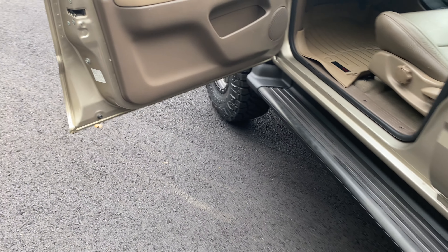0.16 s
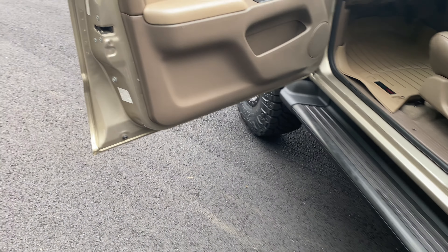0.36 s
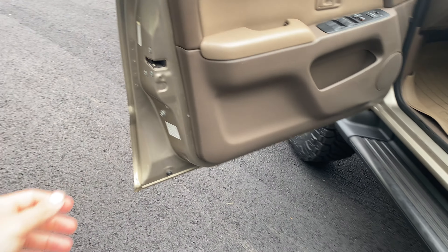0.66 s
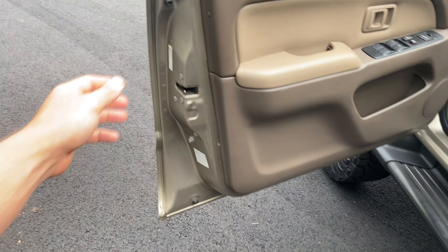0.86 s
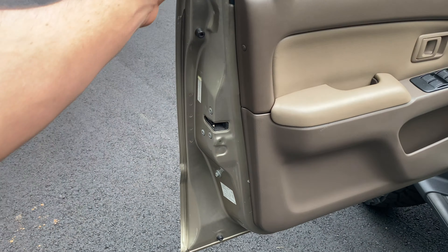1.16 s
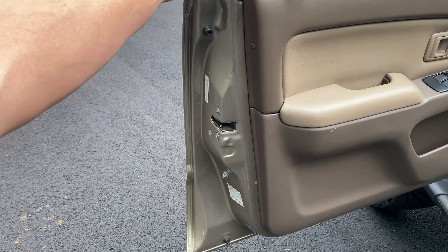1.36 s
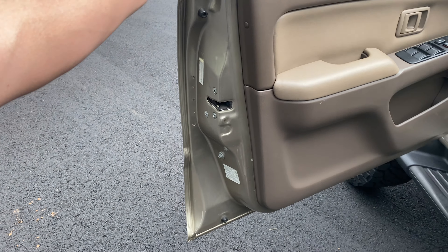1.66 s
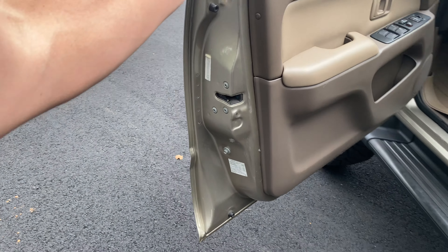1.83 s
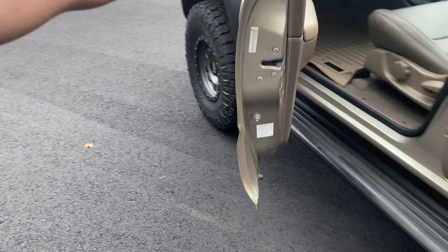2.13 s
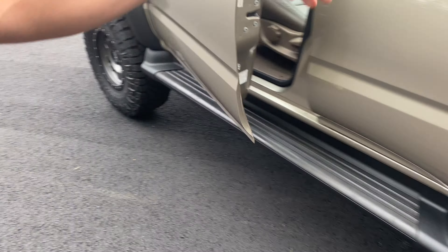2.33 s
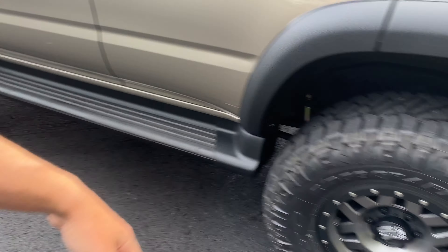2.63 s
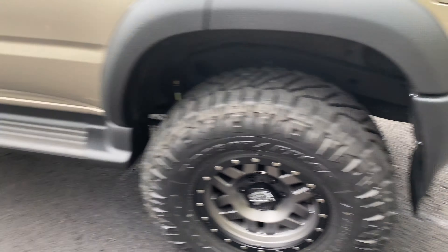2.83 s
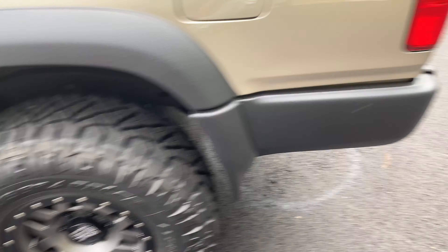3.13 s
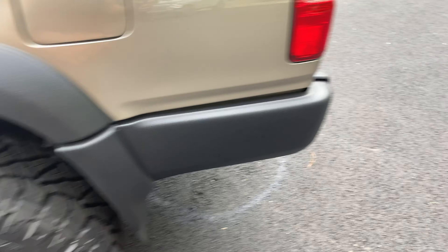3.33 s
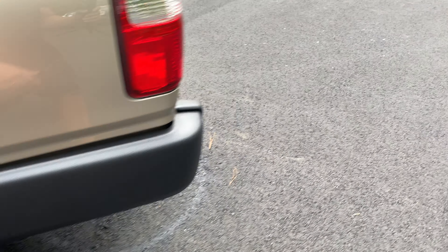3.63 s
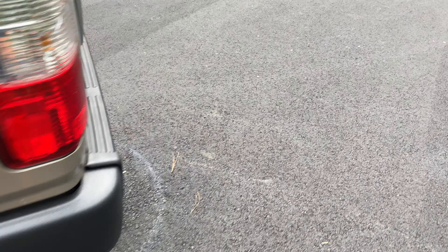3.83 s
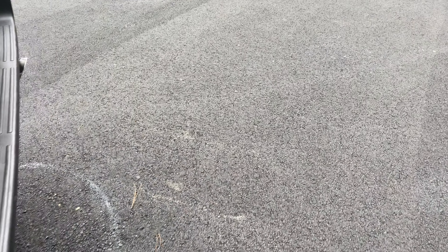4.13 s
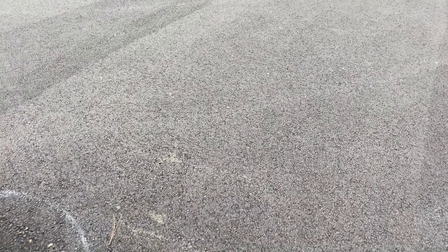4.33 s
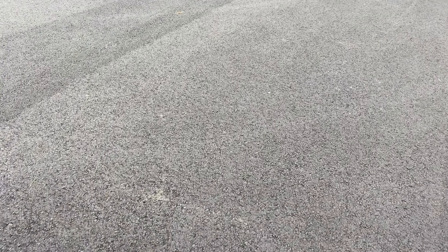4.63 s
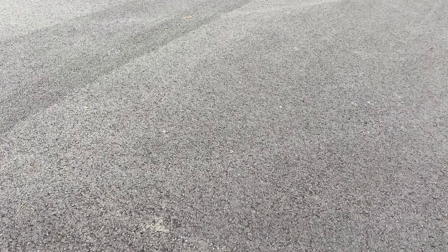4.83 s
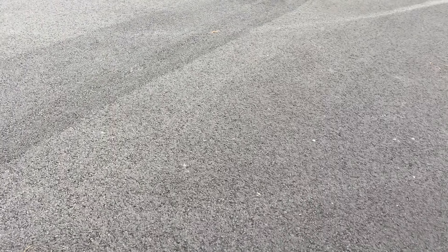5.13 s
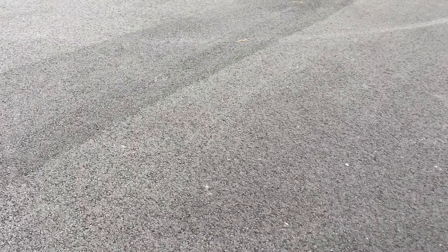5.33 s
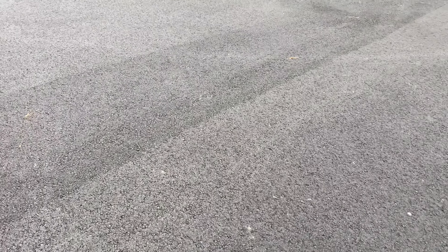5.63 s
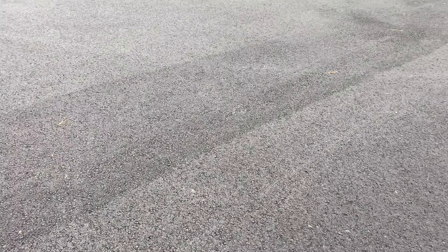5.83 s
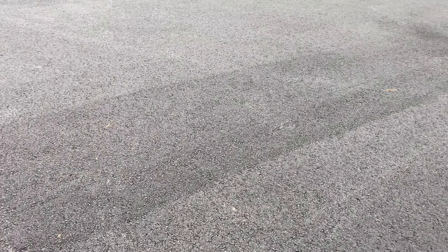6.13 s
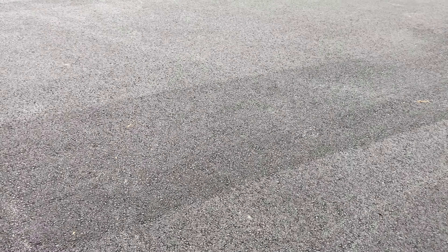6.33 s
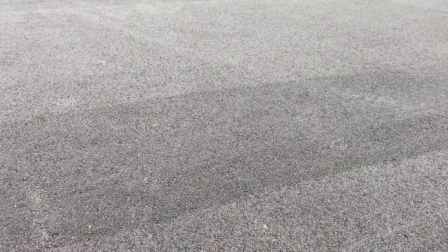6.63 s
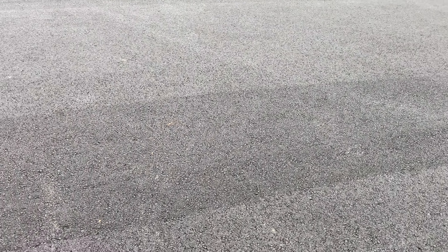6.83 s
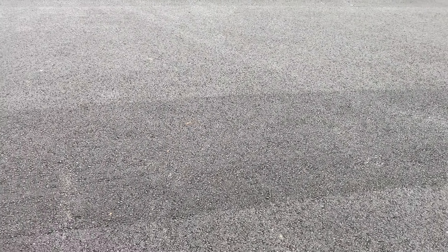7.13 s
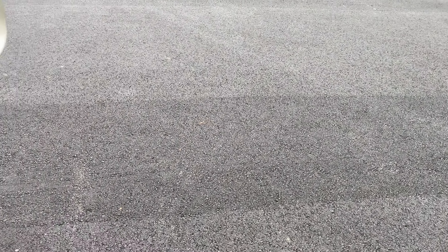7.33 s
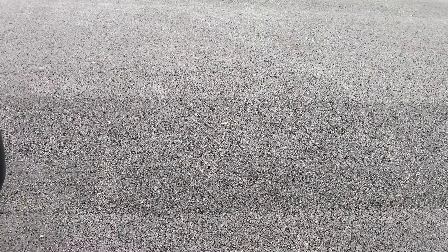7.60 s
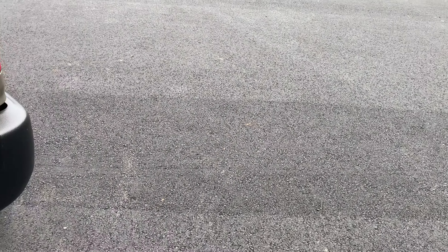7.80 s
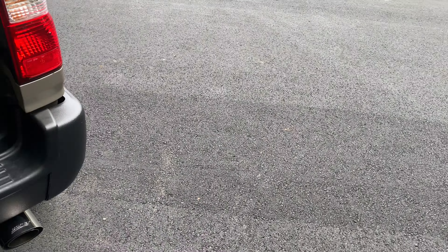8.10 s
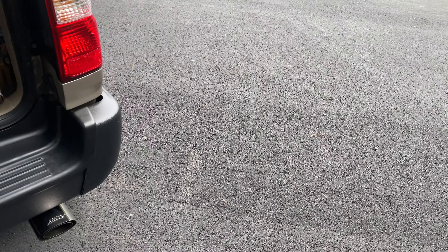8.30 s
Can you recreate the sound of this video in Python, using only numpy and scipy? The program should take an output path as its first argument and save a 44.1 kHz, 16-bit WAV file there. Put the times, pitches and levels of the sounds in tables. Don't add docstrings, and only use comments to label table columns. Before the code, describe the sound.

Close handheld stereo pickup in an open asphalt lot. A car door slams at once, with metallic rattle and a deep cabin thump. Soft steps and tiny clicks follow, then a second door shuts more quietly. Wind buffets over distant traffic and a faint hum. Later a tailgate latch cracks sharply, and light clicks and knocks end it.

```python
import sys
import numpy as np
from scipy import signal
from scipy.fft import rfft, irfft, next_fast_len
from scipy.io import wavfile
from scipy.ndimage import uniform_filter1d, map_coordinates

SR = 44100
rng = np.random.default_rng(int(sys.argv[2]) if len(sys.argv) > 2 else 0)


def digitize_waveform(pressure):
    field = np.atleast_2d(pressure).T
    bounded = np.clip(field, -1, 1)
    quanta = np.round(bounded * 32767).astype(np.int16)
    wavfile.write(sys.argv[1], SR, quanta)


def makeup_ratio(level_db):
    decades = np.asarray(level_db, float) / 20
    return 10 ** decades


N = 373086
PORTS = np.array([[0.5], [-0.5]])


def unit(x):
    return x / np.sqrt(np.mean(x ** 2) + 1e-20)


def along(points, hz):
    f, v = np.transpose(points)
    return np.interp(np.log(hz + 1), np.log(f + 1), v)


def curves(rows):
    s, *cols = np.transpose(rows)
    return [np.interp(np.arange(N) / SR, s, c) for c in cols]


def wobble(rate):
    t = np.linspace(0, N / SR, num=N // 20)
    knots = rng.standard_normal(int(N * rate / SR) + 4)
    return np.interp(np.arange(N) / SR, t, map_coordinates(knots, [t * rate]))


def bells(s, span, size):
    t = np.linspace(0, N / SR, num=2000)
    rows = np.exp(-0.5 * ((t[:, None] - s) / span) ** 2) * size
    return np.interp(np.arange(N) / SR, t, rows.sum(axis=1))


def filtered(x, response):
    m = next_fast_len(x.shape[-1] + 8192)
    spectrum = rfft(x, m) * response(np.fft.rfftfreq(m, 1 / SR))
    return irfft(spectrum, m)[..., :x.shape[-1]]


def resonances(peaks):
    return lambda f: sum((-1) ** k * makeup_ratio(db) * 1j * f * w / (c * c - f * f + 1j * f * w)
                         for k, (c, w, db) in enumerate(peaks))


def panned(db):
    return makeup_ratio(np.outer([0.5, -0.5], db))


def aside(x, pan_db):
    # hz, share
    shadow = [(130, 0.17), (300, 0.34), (700, 0.55), (7000, 0.99), (14000, 0.12)]
    shaded = filtered(x, lambda hz: np.clip(along(shadow, hz), 0, 1))
    return x + (panned(pan_db) - 1) * shaded


def widened(x):
    # hz, side_db
    side_colour = [(4000, 1), (6500, 1), (8500, 6), (11000, 2), (13000, -7)]
    mid = (x[0] + x[1]) / 2
    side = filtered((x[0] - x[1]) / 2, lambda hz: makeup_ratio(along(side_colour, hz)))
    return np.array([mid + side, mid - side])


def add(track, s, sound):
    part = track[:, round(s * SR):round(s * SR) + sound.shape[1]]
    part += sound[:, :part.shape[1]]


def rush(spectrum, alike):
    turn = lambda hz: np.arccos(np.clip(along(alike, hz), -1, 1)) / 2
    mid, side = filtered(rng.standard_normal((2, N)),
                         lambda hz: makeup_ratio(along(spectrum, hz)) * [np.cos(turn(hz)), np.sin(turn(hz))])
    return unit(np.array([mid + side, mid - side]))


def steady(x, span):
    return x / np.sqrt(np.abs(uniform_filter1d(np.mean(x ** 2, 0), size=int(span * SR))) + 1e-9)


def burst(t60, spread, rise_s=0.0019):
    t = np.arange(SR // 4) / SR
    shared, own = rng.standard_normal((2, len(t)))
    noise = np.array([shared + spread * own, shared - spread * own])
    return noise * makeup_ratio(-60 * t / t60) * (1 - np.exp(-t / rise_s))


def impact(contacts, body, rattle, body_db, linger, apart=0.84, body_apart=0.21):
    out = np.zeros((2, N))
    for s, db, rel_db, t60, pan_db in contacts:
        bright = filtered(burst(t60, apart), lambda hz: makeup_ratio(along(rattle, hz)))
        panel = filtered(burst(linger * t60, body_apart), resonances(body))
        sound = bright / np.abs(bright).max() + makeup_ratio(rel_db + body_db) * panel / np.abs(panel).max()
        add(out, s, makeup_ratio(db) * aside(sound, [pan_db]))
    return out


def booms(modes, pan_db, inward=False, turn=0.0):
    out, t = np.zeros((2, N)), np.arange(SR // 2) / SR
    for s, hz, db, t60 in modes:
        swell = 1 - np.exp(-t * hz * 6)
        wave = np.sin(2 * np.pi * hz * t + turn * PORTS) / np.cos(turn / 2)
        add(out, s, panned([pan_db]) * makeup_ratio(db - 60 * t / t60) * swell * wave)
    return -out if inward else out


def ticks(rows, width, spread):
    out = np.zeros((2, N))
    for s, db, hz, t60, pan_db in rows:
        band = resonances([(hz, width * hz, 0)])
        tick = filtered(burst(t60, spread, rise_s=0.0003), lambda f: band(f) ** 2)
        add(out, s, makeup_ratio(db) * panned([pan_db]) * tick / np.abs(tick).max())
    return out


def wind():
    # peak_s, buffet_db, half_length_s, flutter_over_buffet_db
    gusts = [(0.267, -39.5, 0.056, 0), (0.552, -48.5, 0.43, -24), (0.837, -44.5, 0.07, -16),
             (1.113, -43, 0.087, -27), (1.62, -40, 0.11, -35), (1.946, -36, 0.067, -34),
             (2.165, -36, 0.052, -26), (2.29, -43.5, 0.034, -20), (2.456, -38, 0.055, -30),
             (2.67, -46.5, 0.079, -5), (3.208, -47, 0.067, -11), (3.47, -45, 0.073, -14),
             (3.65, -68, 0.056, 2), (3.898, -46, 0.087, -13), (4.313, -43.5, 0.21, -17.5),
             (4.815, -32, 0.063, -23.5), (5.11, -46.5, 0.25, -11.5), (5.334, -32.5, 0.058, -27),
             (5.483, -34, 0.085, -8), (5.735, -35, 0.15, -9.5), (5.893, -30.5, 0.073, -12),
             (6.134, -37.5, 0.077, -10.5), (6.606, -48.5, 0.32, -8), (6.956, -41.5, 0.092, -13.5),
             (7.263, -43.5, 0.092, -4.5), (7.5, -41, 0.52, -16), (7.953, -36, 0.089, -15.5),
             (8.28, -44.5, 0.26, -12.5)]
    # hz, db_per_hz
    buffet_colour = [(2, -30), (5, 15), (16, 8.5), (25, 2), (40, -17), (80, -83)]
    # hz, db_per_hz
    flutter_colour = [(12, -67), (25, -7.5), (50, -6), (100, -16), (200, -36.5), (500, -80)]
    # hz, db_per_hz
    whip_colour = [(70, -26), (130, 6.5), (220, -7), (350, -11), (600, -58)]
    calm_buffet_db, calm_flutter_db = -55, -64.5
    s, db, half_s, rel_db = np.transpose(gusts)
    slow = np.sqrt(makeup_ratio(2 * calm_buffet_db) + bells(s, half_s / np.sqrt(2), makeup_ratio(2 * db)))
    quick = np.sqrt(makeup_ratio(2 * calm_flutter_db) + bells(s, half_s / np.sqrt(2), makeup_ratio(2 * (db + rel_db))))
    lumps = makeup_ratio(2.6 * wobble(20))
    flutter = steady(lumps * rush(flutter_colour, [(30, 0.7), (200, 0.37)]), span=0.17)
    whip_level = np.minimum(quick / makeup_ratio(-44.5), 1) ** 1.32 * makeup_ratio(-63.5 + 7.2 * wobble(17))
    whip = whip_level * rush(whip_colour, [(150, 0.26)])
    return slow * steady(rush(buffet_colour, [(10, 0.92)]), span=0.33) + quick * flutter + whip


def town():
    # time_s, left_right_db, tyre_roar_db
    walk = [(0, 2.5, -91), (2.5, 3.5, -74), (2.85, 5.5, -67), (5.2, 3, -69), (6.5, 4, -67.5),
            (8.46, 2, -63.5)]
    # hz, db_per_hz
    air_colour = [(30, -39), (60, -6), (110, -7), (146, -12.5), (190, -13.5), (234, -11), (330, -16),
                  (400, -17.5), (520, -20), (1150, -21), (1340, -24), (5000, -29), (10500, -35),
                  (12500, -38), (14500, -43), (16000, -45)]
    # hz, db_per_hz
    roar_colour = [(300, -21), (700, -3), (1200, -2.5), (2000, -7), (3500, -50)]
    # hz, correlation
    agreement = [(60, .85), (130, .6), (290, .5), (640, .62), (3100, .55), (6800, .12), (10500, .38),
                 (13000, .66), (15000, .8)]
    pan_db, roar_db = curves(walk)
    air = makeup_ratio(-63.5) * rush(air_colour, agreement)
    roar = makeup_ratio(roar_db - 5.5) * rush(roar_colour, agreement)
    return aside(air + roar, pan_db)


def machine():
    # pitch_hz, unsteadiness_hz, level_db, passed_at_s, audible_for_s
    hum_lines = [(69.7, 3.13, -66, 3.2, 2.9), (90, 1.83, -61.5, 3.55, 0.51), (293, 4.46, -77, 2.96, 1.36),
                 (240, 2.36, -73, 0.84, 0.23), (240, 3.5, -72, 1.97, 0.32), (1160, 6.2, -79.5, 3.84, 0.66)]
    # pitch_hz, level_db, passed_at_s, audible_for_s
    shaft_lines = [(111.1, -63.5, 2.5, 1.86), (224.4, -73.5, 3.3, 1.5), (241, -73.5, 1, 1.67)]
    hum_turn = 0.95
    out = np.zeros((2, N))
    for hz, drift, db, s, span in hum_lines:
        swing = makeup_ratio(2.2 * wobble(5.0))
        phase = 2 * np.pi * np.cumsum(hz + drift * wobble(8)) / SR
        tone = swing * np.sin(phase + hum_turn * PORTS) / np.cos(hum_turn / 2)
        out += bells(s, span, makeup_ratio(db)) * tone
    for hz, db, s, span in shaft_lines:
        phase = 2 * np.pi * hz * np.arange(N) / SR
        out += bells(s, span, makeup_ratio(db)) * np.sin(phase + 0.71 * hum_turn * PORTS)
    return out


def seals():
    # start_s, peak_db, pitch_hz, t60_s, left_right_db
    rubber = [(.1715, -40, 840, .027, 4), (.775, -63, 2000, .16, 21), (1.6845, -49, 10500, 0.003, 1),
              (2.634, -53, 1610, .05, -2), (4.355, -60, 3500, .02, 2), (5.675, -55, 420, 0.078, 8),
              (6.425, -43, 2400, 0.089, 12), (6.50, -54, 590, 0.46, 5), (.225, -52, 4900, 0.11, 2),
              (8, -68, 2200, 0.28, 1), (6.55, -59.5, 4300, .05, 5), (0.21, -42, 1530, .13, 5),
              (0.18, -45, 5500, .14, 1), (.2, -44.5, 3100, 0.19, 4), (6.435, -48, 760, .14, 8)]
    return ticks(rubber, width=0.49, spread=0.34)


def slam():
    # start_s, rattle_peak_db, body_over_rattle_db, t60_s, left_right_db
    contacts = [
        (0.1725, -39.5, 2.5, 0.079, 9),
        (0.1858, -23, -5.5, 0.057, 8),
        (0.1954, -37, 0, 0.12, 4),
        (0.2134, -37.5, 5, 0.029, 18),
        (0.2204, -44.5, 5, 0.12, 8),
        (0.2314, -43, 2, 0.094, 10),
        (0.2494, -41.5, -5, 0.046, 3),
        (0.2644, -54, 4, 0.067, 12),
    ]
    # pitch_hz, width_hz, level_db
    body = [(142, 37, 4.5), (214, 26, 3.5), (266, 28, 0), (312, 82, 1.5), (443, 95, -3), (560, 220, -10.5),
            (803, 62, -7.5), (950, 150, -11.5), (1100, 77, -10.5), (1450, 99, -19)]
    # hz, db
    rattle = [(710, -10), (1200, -3), (1560, -3), (1870, -15), (2510, -7), (3180, -18), (3830, -14.5),
              (5780, -19.5), (6300, -20), (13200, -24.5), (16000, -40)]
    # start_s, pitch_hz, peak_db, t60_s
    pings = [(.1855, 6400, -46, .012), (.187, 1106, -33.5, 0.044), (.187, 2420, -36, 0.04),
             (.190, 420, -28.5, 0.046), (.1862, 4840, -34, .01), (.196, 3800, -38, .012),
             (.2495, 3660, -47, .015), (.1718, 300, -40, .04), (.1718, 1000, -43, .03),
             (.189, 1730, -41, .03), (.247, 1004, -48, .05), (.256, 700, -51, .05),
             (.211, 1100, -38, 0.035), (.2125, 3600, -43, .02), (.214, 1790, -41.5, .04),
             (.224, 995, -40, 0.057), (.232, 1400, -43, .04), (.262, 2050, -56, 0.035),
             (.264, 3650, -58, .015), (.283, 1016, -57, 0.051)]
    return impact(contacts, body, rattle, body_db=6.0, linger=1.48) + booms(pings, pan_db=3.5, turn=1.5)


def slam_ring():
    # start_s, pitch_hz, peak_db, t60_s
    thump = [
        (.189, 27.5, -21.5, .34),
        (.224, 41, -28, .13),
        (.195, 60, -28, .16),
    ]
    # start_s, pitch_hz, peak_db, t60_s
    skin = [(.1985, 139, -30, 0.12), (.2125, 125, -28.5, 0.17), (0.173, 155, -37, 0.23),
            (0.262, 250, -40, 0.18), (.2, 105, -34, .14), (.204, 560, -41, 0.086), (.19, 595, -40, 0.042),
            (.188, 1415, -29.5, 0.045), (.188, 1534, -36, 0.056)]
    return booms(thump, pan_db=2.0) + booms(skin, pan_db=4.0, turn=0.3)


def lot(x):
    # hz, t60_s
    decay = [(100, 0.44), (700, 0.28), (3000, 0.11), (10000, 0.019)]
    # hz, db
    echo_colour = [(500, -1), (2500, 1.5), (5000, -1), (12000, -24)]
    hz, t, z = signal.stft(rng.standard_normal((2, SR // 2)), SR, nperseg=256)
    tail = signal.istft(z * makeup_ratio(-60 * t / along(decay, hz)[:, None]), SR, nperseg=256)[1]
    delayed = np.pad(x, ((0, 0), (600, 0)))
    echo = signal.fftconvolve(delayed, tail / np.linalg.norm(tail[0]), axes=1)[:, :N]
    return filtered(echo, lambda f: makeup_ratio(along(echo_colour, f) - 20.0))


def pins():
    # start_s, peak_db, pitch_hz, t60_s, left_right_db
    clicks = [(.22, -47, 9300, .02, 2), (2.199, -59, 14500, .02, -1), (2.201, -43, 11000, .05, -4),
              (2.204, -51, 12500, .04, -2), (2.328, -63, 12000, .01, 0), (2.70, -57, 8500, .015, -1),
              (6.19, -67, 10500, .05, -10), (6.272, -68, 5000, .04, 6), (6.3985, -36, 4470, 0.012, 0),
              (6.396, -32, 6200, .01, 9)]
    return ticks(clicks, width=0.072, spread=0.38)


def footsteps():
    # start_s, peak_db, pitch_hz, left_right_db
    treads = [(.785, -49.5, 800, 0), (1.58, -64, 450, -12), (2.33, -53, 600, 3), (2.38, -58, 900, 0),
              (2.96, -59, 500, -10), (3.62, -56, 500, 9), (3.70, -57, 450, 10), (4.25, -70, 600, 0),
              (4.875, -55, 600, 6), (4.92, -59, 600, 4), (4.97, -66, 600, 5), (6.0, -53, 1500, 7)]
    t60_s = 0.12
    return ticks([(s, db, hz, t60_s, pan_db) for s, db, hz, pan_db in treads], width=1.8, spread=2.0)


def clips():
    # start_s, pitch_hz, peak_db, t60_s
    clip_pings = [
        (2.5, 2330, -58, .015),
        (2.173, 2150, -54, .025),
        (1.6845, 11800, -48, .003),
    ]
    return booms(clip_pings, pan_db=3.0)


def trim():
    # start_s, peak_db, pitch_hz, t60_s, left_right_db
    trim_knocks = [(2.038, -52, 1620, 0.012, -2), (2.159, -56, 1020, 0.014, 9), (2.16, -50, 2270, .012, 7),
                   (2.171, -51.5, 950, 0.027, 2), (2.172, -50, 2100, 0.04, 16),
                   (2.329, -57, 1400, 0.015, 6), (6.037, -56.5, 2500, 0.102, 14),
                   (6.043, -56, 800, 0.08, 15), (7.388, -50, 2400, 0.036, -2), (7.282, -51, 4600, .05, 3)]
    return ticks(trim_knocks, width=0.53, spread=0.9)


def hinge():
    # start_s, peak_db, pitch_hz, t60_s, left_right_db
    squeak = [
        (2.10, -70, 7650, 0.98, 7),
    ]
    return ticks(squeak, width=0.032, spread=0.57)


def shut():
    # start_s, rattle_peak_db, body_over_rattle_db, t60_s, left_right_db
    contacts = [
        (2.615, -55, 10, 0.042, -5),
        (2.6285, -44, -2.5, 0.1, -3),
        (2.6301, -36, -4, 0.067, -3),
        (2.6575, -41, -0.5, 0.04, -2),
        (2.6754, -61, 6, 0.036, -2),
        (2.6997, -57, 1.5, 0.095, -2),
    ]
    # pitch_hz, width_hz, level_db
    body = [(190, 26, -2), (302, 60, 2), (343, 47, 2), (430, 110, 3), (600, 210, -4), (790, 67, -6.5),
            (950, 85, -9.5), (1400, 470, -12.5)]
    # hz, db
    rattle = [(880, -25), (1500, -15), (2190, -4), (2940, -9), (3410, -6), (5440, -9), (6830, -8),
              (16000, -16)]
    # start_s, pitch_hz, peak_db, t60_s
    pings = [(2.621, 3820, -56, .02), (2.631, 2090, -54, .05), (2.632, 3430, -56, 0.026),
             (2.638, 914, -43, 0.035), (2.629, 1410, -52, .04), (2.641, 6940, -47, .015),
             (2.644, 5850, -48, 0.025), (2.659, 1510, -51, .04), (2.698, 420, -56, .05)]
    knock = impact(contacts, body, rattle, body_db=7.0, linger=1.9, apart=1.2, body_apart=1.3)
    return knock + booms(pings, pan_db=0.0, turn=2.05)


def shut_ring():
    # start_s, pitch_hz, peak_db, t60_s
    skin = [(2.652, 100, -35, 0.074), (2.6615, 52, -29.5, 0.05), (2.659, 117, -41, 0.1),
            (2.5, 71, -40.5, 0.1), (2.675, 180, -43.5, .11), (2.645, 99, -46, .1), (2.64, 314, -46, .06),
            (2.6575, 304, -35, 0.06), (2.657, 450, -39, 0.05), (2.6331, 428, -38, 0.044)]
    return booms(skin, pan_db=-8.0, inward=True, turn=-1.6)


def lift():
    # start_s, rattle_peak_db, body_over_rattle_db, t60_s, left_right_db
    contacts = [
        (5.6351, -59, -2, 0.037, 15),
        (7.2769, -39.5, -10, 0.021, 1),
        (7.283, -49.5, 0, 0.037, 2.1),
        (7.2914, -57, 5.5, 0.052, 2.5),
    ]
    # pitch_hz, width_hz, level_db
    body = [(372, 114, 2), (682, 59, 1), (970, 340, -10.5)]
    # hz, db
    rattle = [(760, -24), (1300, -5), (1800, -2), (2860, -24), (3700, -19), (4990, -7), (5420, -12),
              (6480, -12), (7830, -38), (9560, -15), (16000, -28)]
    # start_s, pitch_hz, peak_db, t60_s
    pings = [(5.636, 5330, -66, .015), (5.672, 3500, -60, .012), (5.672, 1300, -58, .015),
             (5.68, 4000, -66, .05), (7.277, 5850, -46.5, 0.027), (7.278, 4930, -48, 0.028),
             (7.278, 1770, -52, 0.033), (7.279, 14100, -60, .015), (7.369, 1850, -55, .03),
             (7.379, 2050, -58, .02), (7.285, 2020, -53, .04), (7.369, 5750, -65, .02),
             (7.388, 800, -45, 0.022), (7.388, 1440, -49, 0.032), (7.396, 1250, -52, .04),
             (7.389, 3300, -54, .02)]
    click = impact(contacts, body, rattle, body_db=6.5, linger=0.89, apart=0.4, body_apart=0.17)
    return click + booms(pings, pan_db=1.5, turn=0.87)


def knocks():
    # start_s, rattle_peak_db, body_over_rattle_db, t60_s, left_right_db
    contacts = [
        (5.671, -55.5, 0, 0.026, 13),
        (5.6814, -63.5, 6, 0.092, 2),
        (7.3354, -60.5, 7.5, 0.055, 2),
        (7.3687, -59, 7, 0.042, 0.5),
        (7.3785, -56, 6, 0.044, 0.0),
        (7.3875, -43.5, -3.5, 0.036, 0),
        (7.401, -47, -1, 0.024, 1),
        (7.4144, -58, -2, 0.025, -3),
    ]
    # pitch_hz, width_hz, level_db
    body = [(386, 340, 2), (650, 115, 7), (906, 66, 5.5), (1400, 150, -11)]
    # hz, db
    rattle = [(880, -30), (1500, 5.5), (1640, -10), (2970, -9.5), (3250, -13), (3800, -7), (5500, -30),
              (9000, -50), (11700, -66), (19800, -120)]
    return impact(contacts, body, rattle, body_db=2.5, linger=2.0, apart=0.26, body_apart=0.2)


def latch():
    # start_s, rattle_peak_db, body_over_rattle_db, t60_s, left_right_db
    contacts = [
        (6.2711, -66, 14.5, 0.043, 6.9),
        (6.2985, -49, 2, 0.05, 13),
        (6.3032, -56, -4, 0.036, 6.8),
        (6.3935, -63, 10, 0.09, 8.5),
        (6.3967, -23.5, -8.5, 0.023, 15),
        (6.4033, -23, -32, 0.026, 11.7),
        (6.4104, -36.5, 6, 0.017, 13),
        (6.4194, -50.5, 17.5, 0.019, 6.2),
        (6.4424, -51, 6.5, 0.038, 13),
    ]
    # pitch_hz, width_hz, level_db
    body = [(118, 61, -5.5), (218, 53, -9.5), (296, 95, -8), (419, 89, -3), (670, 65, -9.5),
            (866, 110, -13), (1150, 390, -18.5)]
    # hz, db
    rattle = [(900, -5), (1500, 0), (2300, 0), (3100, -7), (4300, -4.5), (6000, -7.5), (8600, -10.5),
              (13000, -12.5), (16000, -25)]
    # start_s, pitch_hz, peak_db, t60_s
    pings = [(6.272, 4900, -67, .05), (6.298, 4260, -54, 0.018), (6.298, 7300, -57, .015),
             (6.299, 2400, -57, .02), (6.304, 520, -53, .03), (6.303, 4700, -58, .03),
             (6.303, 1125, -51, 0.043), (6.3965, 4210, -25, .016), (6.3965, 5600, -32, .015),
             (6.3965, 6440, -37, 0.015), (6.398, 3060, -36.5, 0.036), (6.404, 5120, -35, .03),
             (6.397, 1155, -40, .04), (6.403, 1074, -34.5, .05), (6.4125, 900, -26, 0.011),
             (6.43, 943, -40, 0.043)]
    crack = impact(contacts, body, rattle, body_db=3.5, linger=1.56)
    return crack + booms(pings, pan_db=5.5, turn=0.88)


def latch_ring():
    # start_s, pitch_hz, peak_db, t60_s
    panel_modes = [(6.322, 240, -50.5, 0.081), (6.3925, 250, -36, .05), (6.4005, 251, -34, 0.042),
                   (6.414, 253, -35, 0.086), (6.43, 420, -47, .08), (6.396, 151.4, -39, .15)]
    # start_s, pitch_hz, peak_db, t60_s
    sag = [
        (6.47, 65.6, -41, .26),
    ]
    return booms(panel_modes, pan_db=7.0 + 0.5, inward=True, turn=0.3) + booms(sag, pan_db=2.0)


def gate():
    # start_s, pitch_hz, peak_db, t60_s
    lower_mode = [
        (6.3925, 422, -32.5, .6),
        (6.3997, 417, -41.5, .6),
    ]
    # start_s, pitch_hz, peak_db, t60_s
    upper_mode = [
        (6.3945, 593, -31.5, 0.47),
    ]
    settles_s, upper_settles_s, muffled_t60_s = 6.424, 6.417, 0.018
    muffle = lambda s: makeup_ratio(-60 * np.maximum(np.arange(N) / SR - s, 0) / muffled_t60_s)
    low = booms(lower_mode, pan_db=11.5, inward=True, turn=0.15) * muffle(settles_s)
    high = booms(upper_mode, pan_db=7.0, inward=True, turn=0.9) * muffle(upper_settles_s)
    return low + high


def strut():
    # time_s, level_db
    slide = [(0, -110), (7.45, -110), (7.75, -84), (8.1, -85), (8.46, -86)]
    hiss = rush([(11000, -40), (13000, -3), (14500, -2), (16000, -8)], [(14000, 0.56)])
    return makeup_ratio(curves(slide)[0]) * hiss


def scene():
    car = slam() + shut() + lift() + knocks() + latch()
    rings = slam_ring() + shut_ring() + latch_ring() + gate()
    small = seals() + pins() + footsteps() + clips() + trim() + hinge()
    return wind() + town() + machine() + widened(car) + lot(car) + rings + small + strut()


def roll_off(x):
    return signal.sosfilt(signal.butter(12, 16460, fs=SR, output="sos"), x)


def record(dry):
    ceiling, top_hz = 0.2, 15740
    held = dry / (1 + np.abs(dry / ceiling) ** 4) ** 0.25
    heard = filtered(held, lambda hz: 1 / (1 + (hz / top_hz) ** 300))
    return roll_off(heard)


dry = scene()
out = record(dry)
digitize_waveform(out)
```